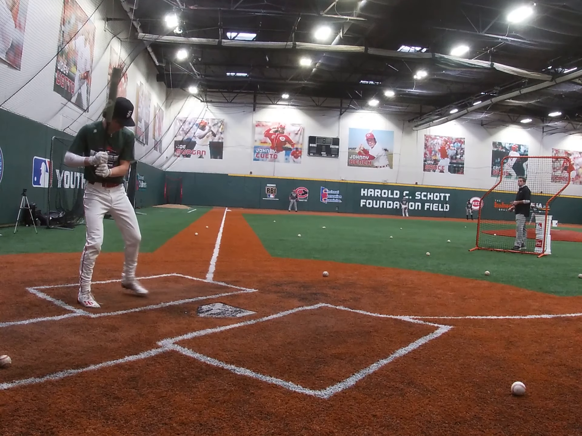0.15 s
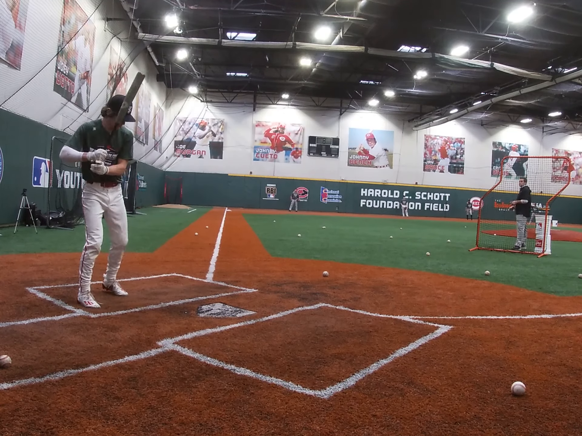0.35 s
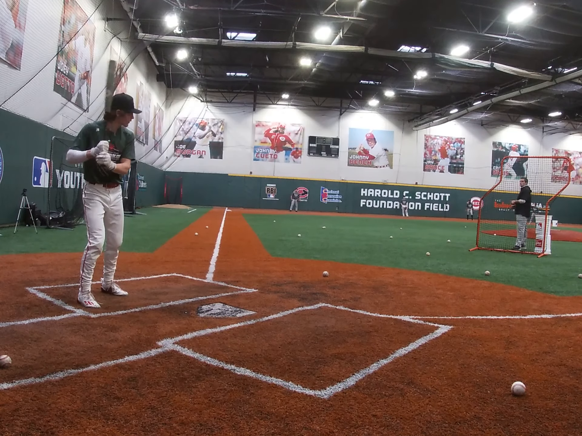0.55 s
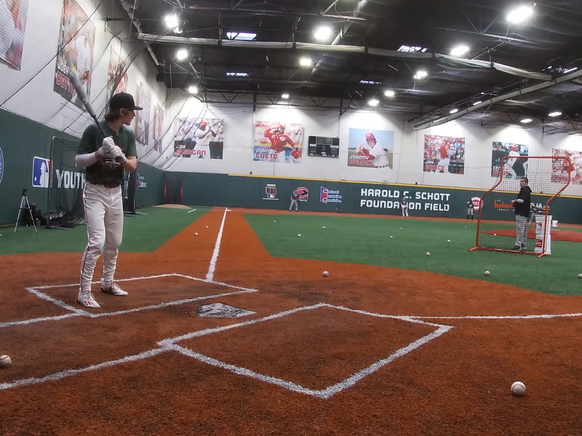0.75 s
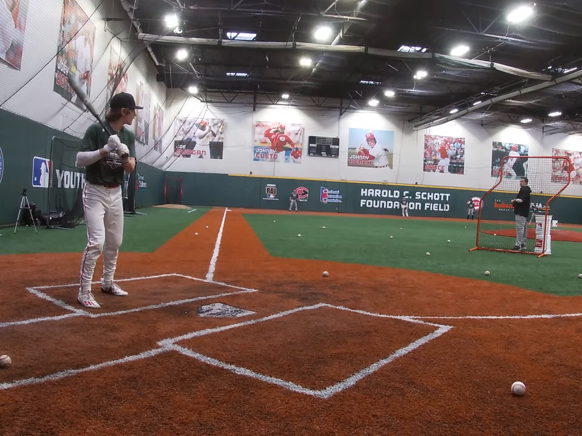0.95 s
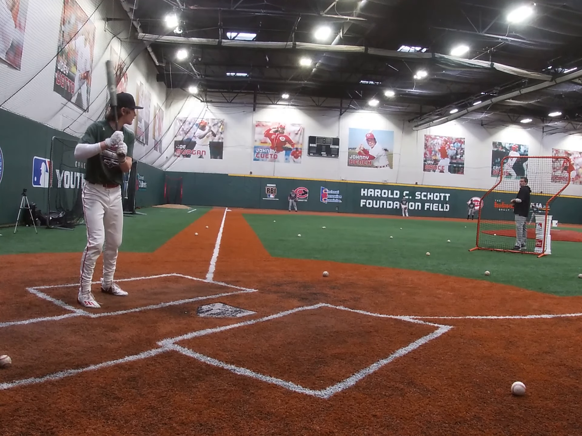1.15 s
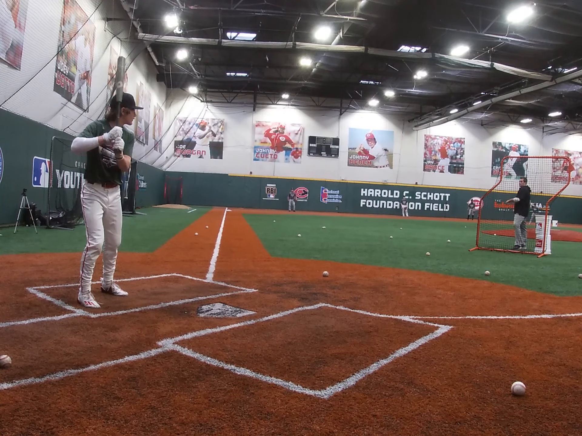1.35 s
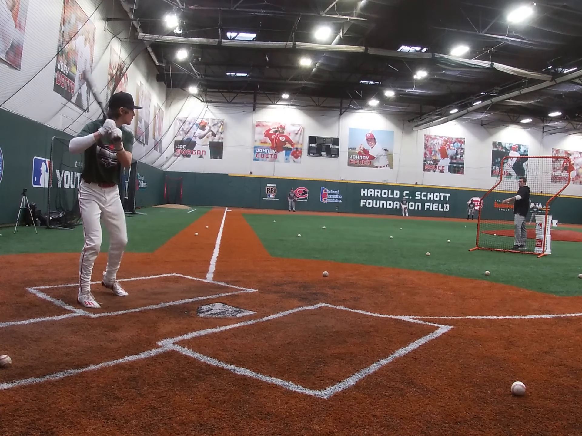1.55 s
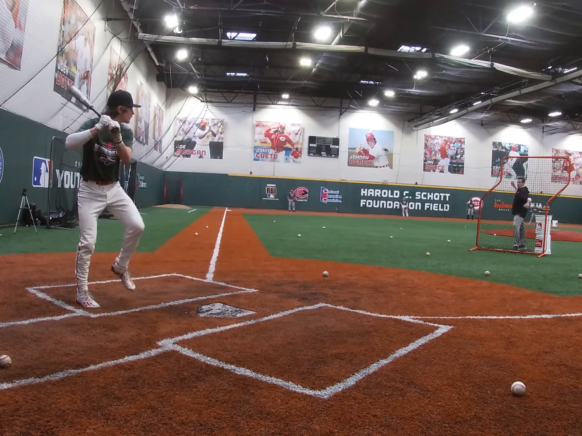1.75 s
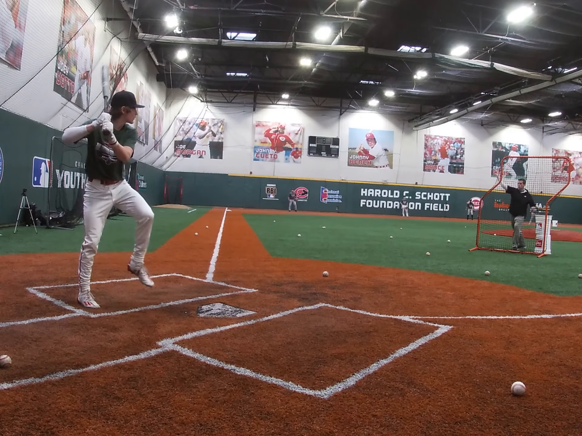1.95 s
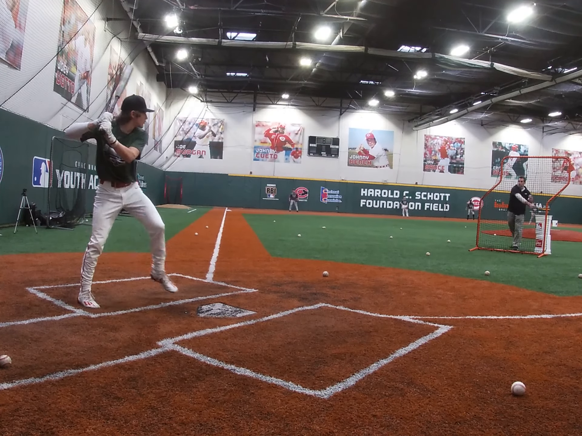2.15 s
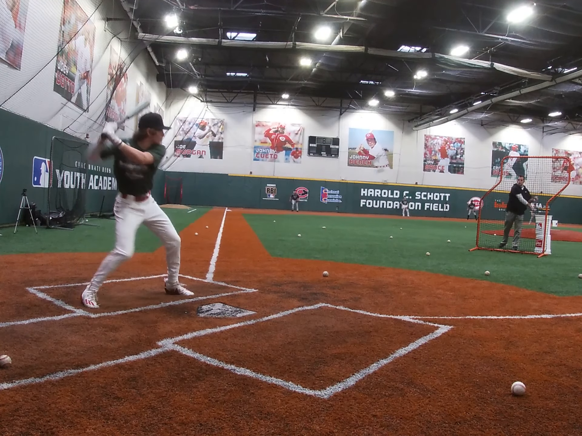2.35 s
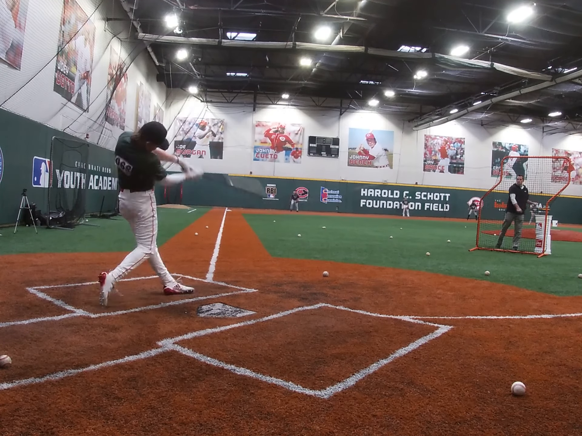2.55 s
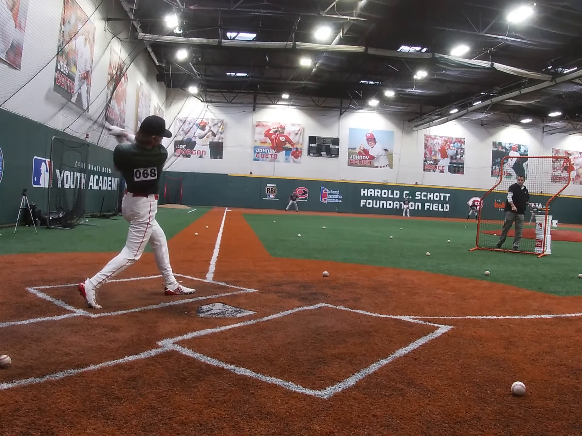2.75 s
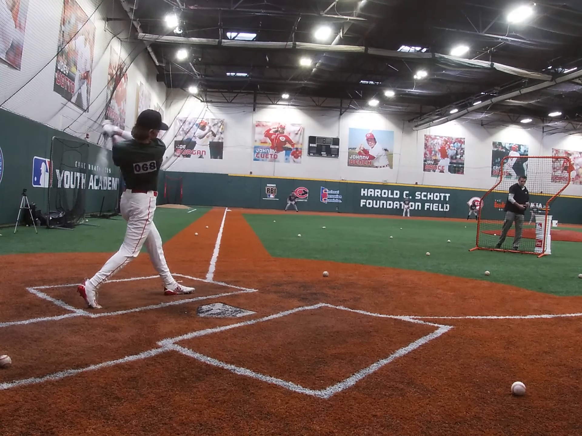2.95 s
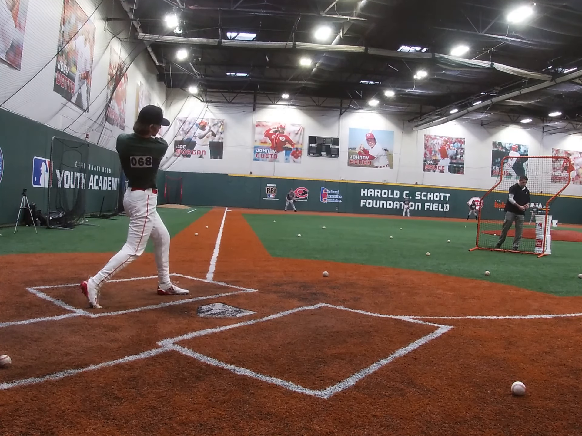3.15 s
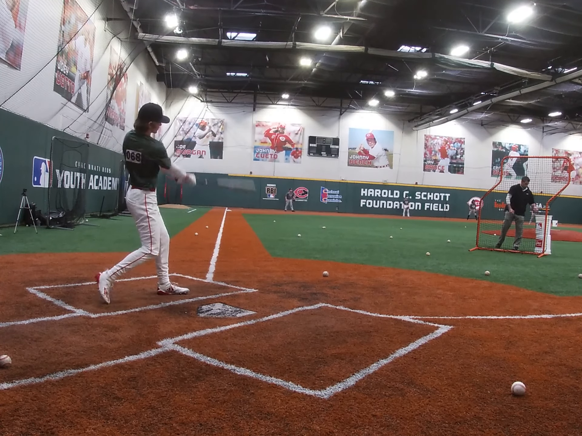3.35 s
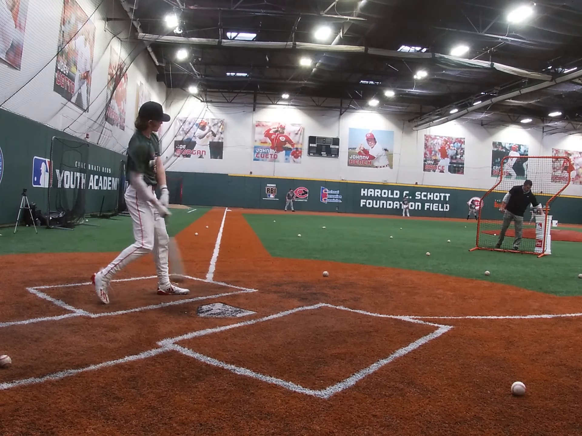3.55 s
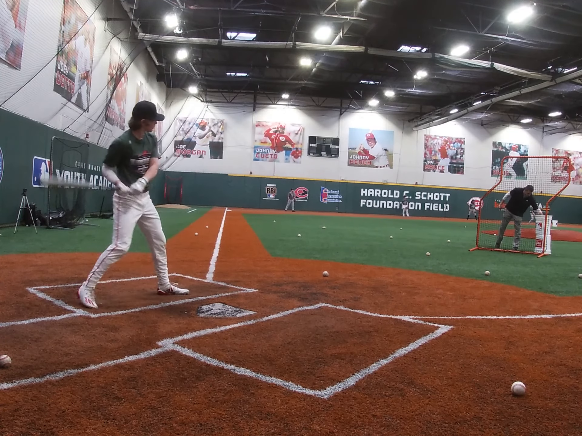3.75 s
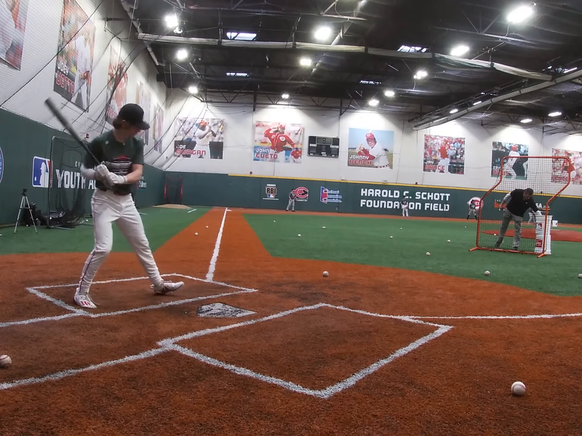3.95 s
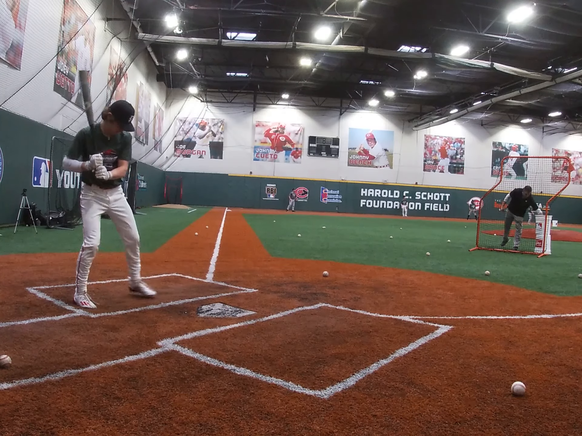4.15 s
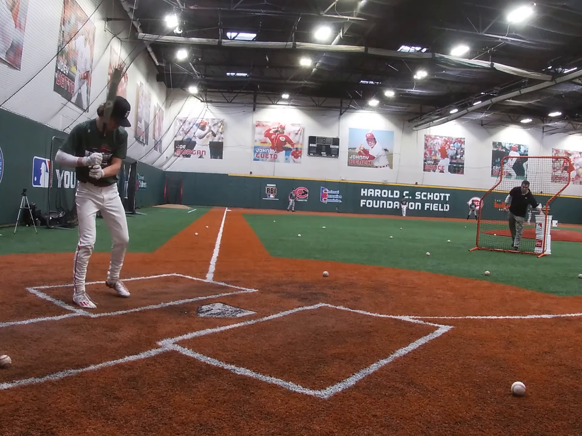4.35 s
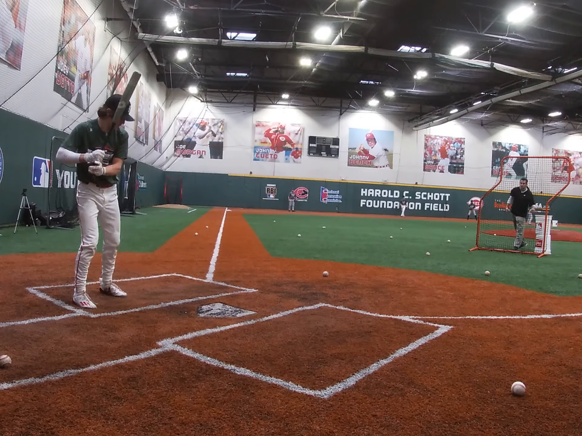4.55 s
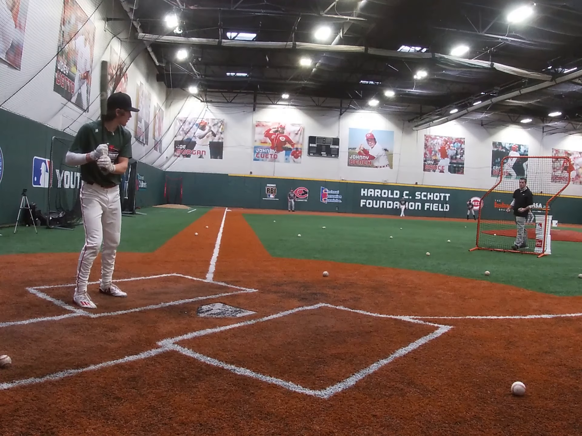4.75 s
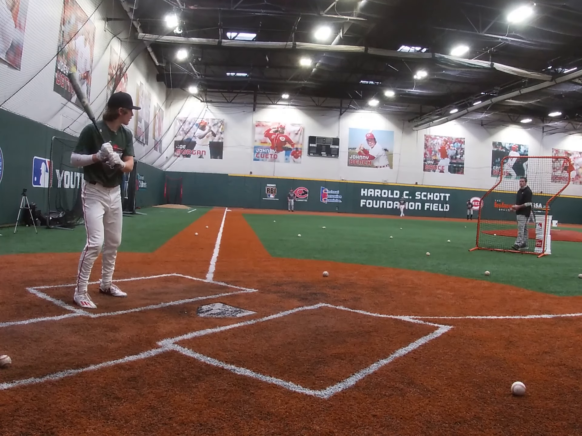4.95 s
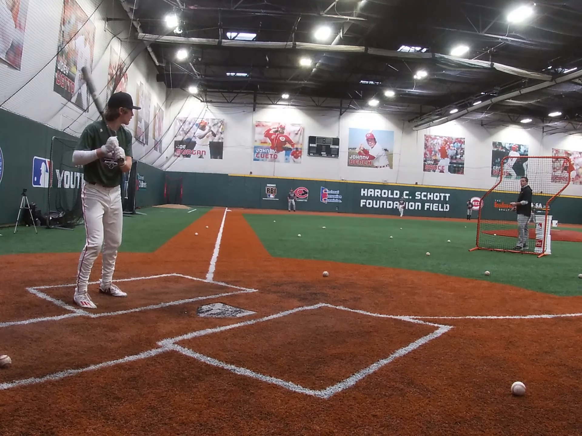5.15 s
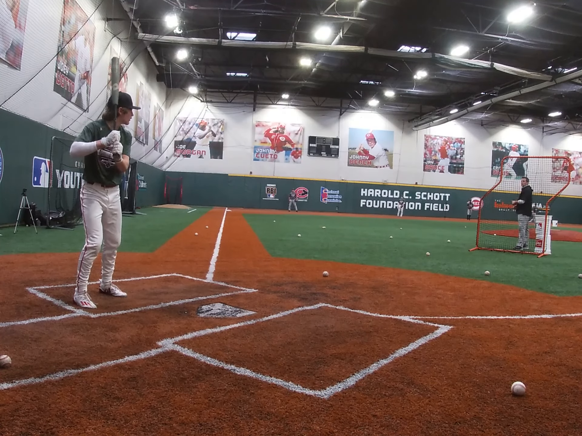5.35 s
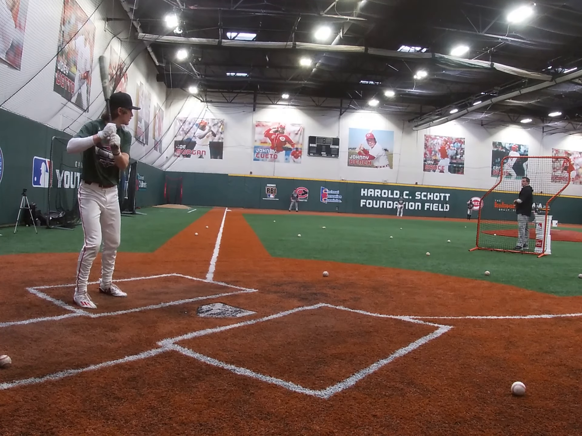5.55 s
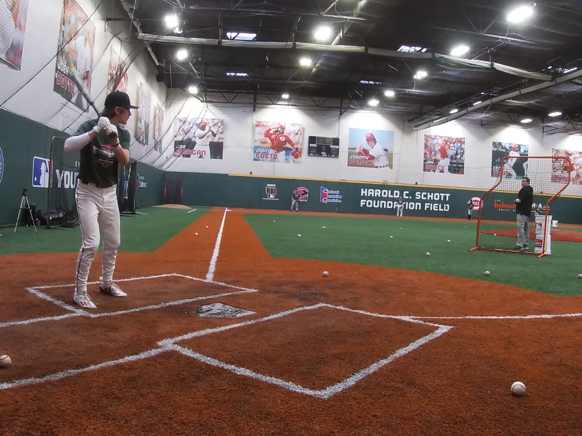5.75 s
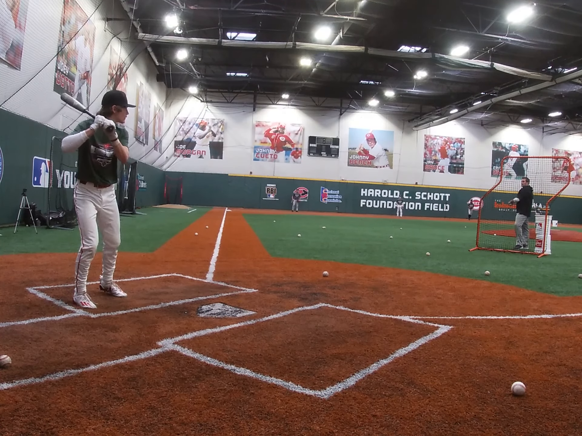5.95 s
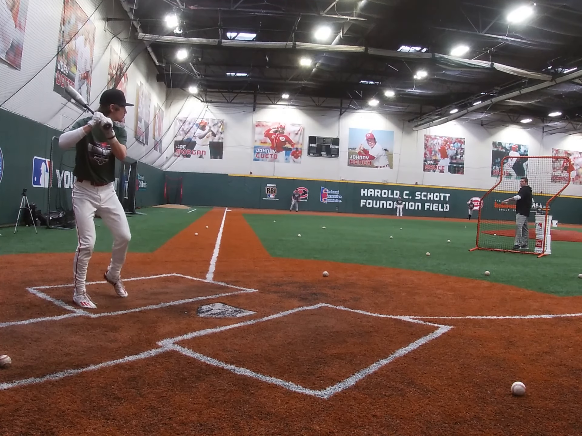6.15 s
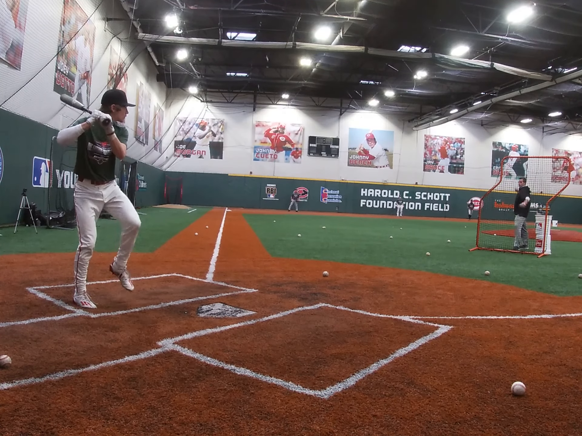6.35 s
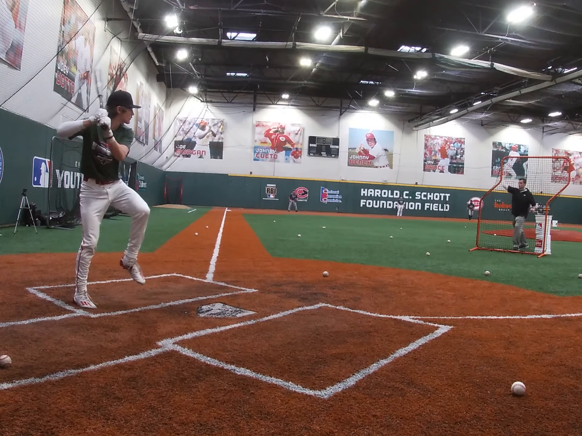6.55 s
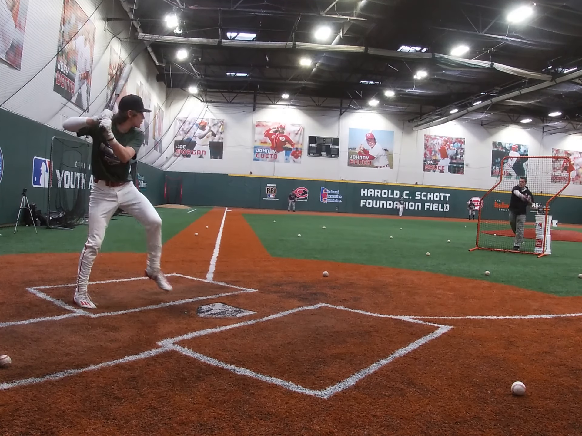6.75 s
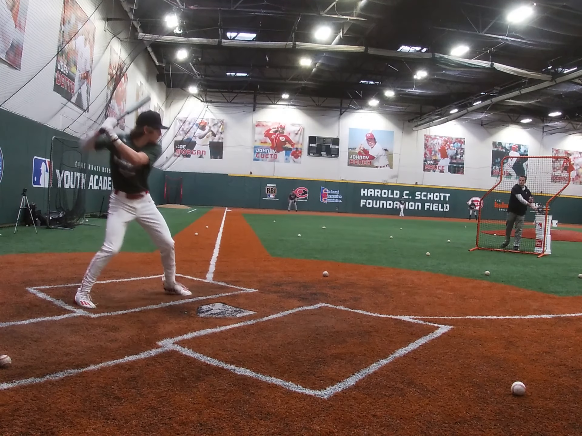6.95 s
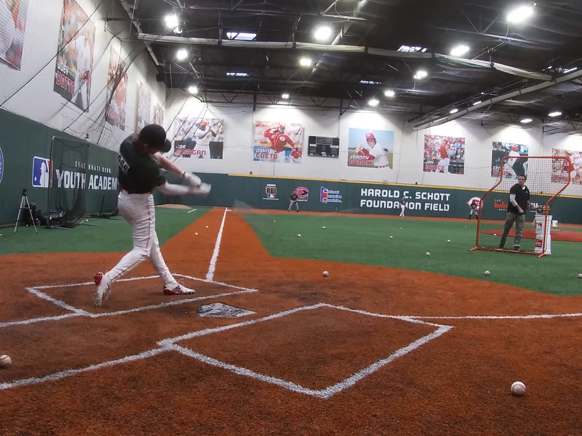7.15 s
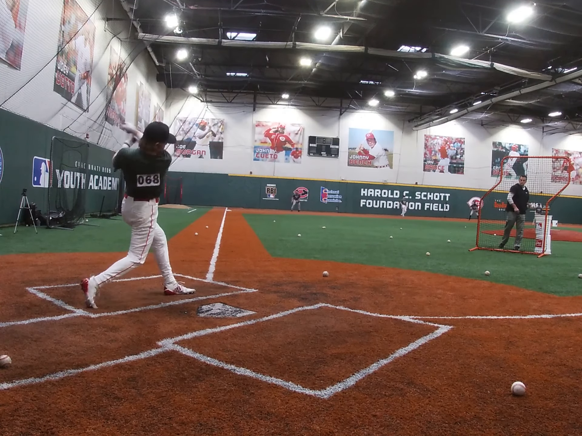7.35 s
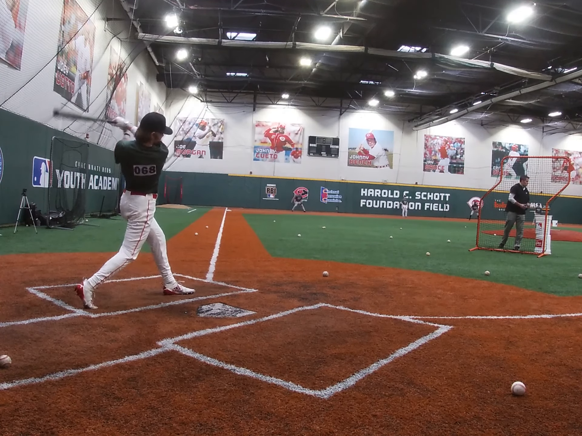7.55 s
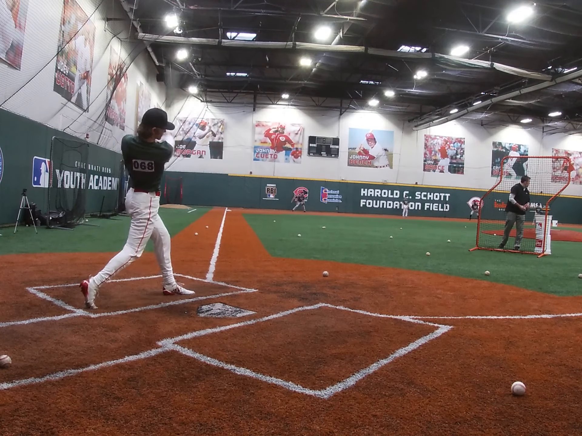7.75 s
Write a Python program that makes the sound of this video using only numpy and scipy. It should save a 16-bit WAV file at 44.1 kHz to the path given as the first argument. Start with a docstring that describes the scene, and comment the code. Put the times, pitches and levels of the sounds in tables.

```python
"""Ventilation rumbles through a large indoor hall, and a dull thud sounds further off, as batting practice begins.
Shoes scuff, then come two swings: each a swish of torn air, a hard crack of filtered impulse and a short modal ring.
The far wall and the roof throw the cracks back as slaps and pings over a diffuse tail; side netting adds a wash.
Between the swings balls scrape, jingle and clack in the thrower's wire basket: bursts of clicks ringing modes.
A limiter ducks everything after each crack and lets go slowly."""
import sys
import numpy as np
from scipy import signal
from scipy.fft import rfft, irfft
from scipy.io import wavfile
from scipy.ndimage import uniform_filter1d

SR = 44100
rng = np.random.default_rng(int(sys.argv[2]) if len(sys.argv) > 2 else 0)


def transcribe(signal):
    """Save signal, clipped to [-1, 1], as a 16-bit WAV file at the path in sys.argv[1]."""
    frames = np.atleast_2d(signal).T
    limited = np.clip(frames, -1, 1)
    pcm = np.round(limited * 32767).astype(np.int16)
    wavfile.write(sys.argv[1], SR, pcm)


N = 343980
T = np.arange(N) / SR
TAIL = T[:2 * SR]  # time axis of the reflections, in seconds


def undb(db):
    """Decibels to gain."""
    return 10 ** (np.asarray(db) / 20)


def unit(x):
    """Scale to rms 1."""
    return x / np.sqrt(np.mean(x ** 2))


def add(out, s, x):
    """Mix x into out from time s on."""
    i = int(s * SR)
    out[i:i + len(x)] += x[:len(out) - i]


def on_log(hz, points):
    """Read (Hz, value) points on a log-frequency axis."""
    f, value = np.transpose(points)
    return np.interp(np.log(hz + 1), np.log(f), value)


def colour(x, points):
    """Filter x by a (Hz, dB) curve."""
    hz = np.fft.rfftfreq(len(x), 1 / SR)
    return irfft(rfft(x) * undb(on_log(hz, points)), len(x))


def lowpass(x, hz, order=4):
    """Causal low-pass."""
    sos = signal.butter(order, min(hz, SR / 2 - 1000), fs=SR, output="sos")
    return signal.sosfilt(sos, x)


def walk(rate, size):
    """A random wander through `rate` new values a second, with a spread near 1."""
    return np.interp(T[:size] * rate, np.arange(1024), rng.standard_normal(1024))


def burst(length_s, grain_db=3, rise=0):
    """A dying cloud of uneven clicks, of unit energy; it swells over the share `rise` of its length."""
    t = T[:SR // 2]
    swell = np.minimum((t + 1 / SR) / (rise * length_s + 1 / SR), 1)
    unevenness = undb(grain_db * rng.standard_normal(len(t)))
    x = rng.standard_normal(len(t)) * unevenness * np.exp(-t / length_s) * swell
    return x / np.linalg.norm(x)


def rub(db, length_s, grain_db=3, rise=0):
    """A cloud of contact clicks whose strength is set by db, whatever its length."""
    return undb(db) * burst(length_s, grain_db, rise) * np.sqrt(length_s * SR / 2)


def ring(modes, pitch=1):
    """Damped sines from (Hz, t60 s, dB) rows: each mode of a struck body dies at its own rate."""
    t = T[:SR // 4]
    out = 0
    for hz, t60, db in modes:
        decay = np.exp(-np.log(1000) * t / t60)
        out = out + undb(db) * decay * np.sin(2 * np.pi * hz * pitch * t)
    return out


def resonate(clicks, modes, pitch=1):
    """A set of modes rings under a run of clicks."""
    body = ring(modes, pitch)
    return signal.fftconvolve(clicks, body / np.linalg.norm(body))


# Air noise from the ducts. Each row: frequency in Hz, spectral level in relative dB.
DUCT_AIR = [(12, -38), (20, -7.5), (42, 0.5), (63, 0), (108, -13), (175, -16.5), (205, -24), (268, -30.5),
            (360, -31), (390, -32.5), (538, -40), (2680, -51), (3320, -54), (7820, -68), (12000, -88.5),
            (15600, -119), (22000, -120)]
# Fan motor tones. Each row: frequency in Hz, rms level in dB.
FAN_HUM = [(120, -44.5), (179, -45.5), (360, -58)]


def ventilation(air_db=-25, flutter_db=0.5, waver_rad=0.49, hiss_db=-63):
    """Duct rumble that flutters, a steady hiss from the outlets, and motor hum of wavering phase."""
    air = undb(air_db) * unit(colour(rng.standard_normal(N), DUCT_AIR))
    rumble = colour(air, [(150, -2.5), (400, -45.5)])
    flutter = rumble * (undb(flutter_db * walk(8.6, N)) - 1)
    hiss = colour(rng.standard_normal(N), [(1000, -16.0), (2500, -10.5), (3400, 0.5), (4500, -11.5),
                                           (8400, -13.5), (9500, -37.0), (13000, -59.5)])
    hum = 0
    for hz, db in FAN_HUM:
        phase = 2 * np.pi * hz * T + waver_rad * walk(9.7, N)
        hum = hum + undb(db) * np.sqrt(2) * np.sin(phase)
    return air + flutter + undb(hiss_db) * unit(hiss) + hum


# Tone of the wash round a dull thud further off. Each row: frequency in Hz, gain in dB.
THUD_WASH = [(100, -13), (250, -1), (550, -7.5), (850, -22.5), (2000, -27), (8000, -59)]


def distant_thud(start_s=.0975, mode_db=-23, mode_hz=560, mode_t60_s=0.013, wash_db=16):
    """One short, dulled mode for the blow, and a noise burst for its wash of reflections."""
    thud, wash = np.zeros((2, N))
    add(thud, start_s, lowpass(ring([(mode_hz, mode_t60_s, mode_db)]), 620))
    add(wash, start_s, undb(wash_db) * lowpass(burst(0.12, rise=0.15), 7000))
    return thud + colour(wash, THUD_WASH)


# Shoes scuffing the turf. Each row: start in seconds, level in dB before the tone curve.
SHOE_SCUFFS = [(2.43, -56), (2.592, -46), (6.1, -56), (6.294, -54)]
# Low thumps as the batter steps back. Each row: start in seconds, level in dB before the low-pass.
BACK_STEPS = [(4.035, -6.5), (4.239, -15)]


def shoes(scuff_s=0.0082, step_hz=52, step_t60_s=0.045):
    """Scuffs are short clouds of friction clicks; steps are single damped low modes."""
    scuffs, steps = np.zeros((2, N))
    for s, db in SHOE_SCUFFS:
        add(scuffs, s, rub(db, scuff_s))
    for s, db in BACK_STEPS:
        add(steps, s, lowpass(ring([(step_hz, step_t60_s, db)]), 180))
    return steps + colour(scuffs, [(1000, -21.0), (4000, 7.5), (8500, 0.0), (12000, -32.0)])


# The swings, shared by swish and batting. Each row: moment of the crack in seconds, gain of the blow in dB,
# hall send in dB, ring sent into the hall in dB, Doppler rise of the ring towards the far wall as a share
# of its pitch, side netting send in dB, ring sent into the netting in dB.
BAT_SWINGS = [(2.6471, 5.5, -2.5, -.5, .103, -12, 3), (7.2654, 2, -3.5, -8, .085, -19, -2.5)]


def swish(db=-33, rise_s=0.015, fall_s=0.016):
    """Air torn by the barrel: coloured noise, loudest where the bat is fastest."""
    speed = 0
    for s, *_ in BAT_SWINGS:
        speed = speed + np.exp(-np.maximum((s - T) / rise_s, (T - s) / fall_s))
    air = colour(rng.standard_normal(N), [(60, -32.5), (220, 3.0), (600, -7.5), (3000, -18.0),
                                          (8000, -28.0), (12000, -47.5)])
    return undb(db) * speed * unit(air)


def crack(spectrum, dispersion=0.855):
    """The blow itself: bending waves carry the treble out first and the bass a millisecond or two later."""
    hz = np.fft.rfftfreq(SR // 4, 1 / SR)
    delay = np.exp(-1j * dispersion * np.sqrt(hz))  # phase in radians grows with the root of frequency
    blow = irfft(undb(on_log(hz, spectrum)) * delay, SR // 4)
    return blow * np.exp(-(T[:SR // 4] / .05) ** 2)


# A surface that scatters for this long returns half its energy as a clean slap.
MIRROR_S = .002


def echoes(table, low_hz=500, air_db_per_s=18, grain_db=9):
    """Each surface returns a mirror-like slap and scattered ones; the long way through the air dulls them."""
    out, hz = np.zeros(len(TAIL)), np.fft.rfftfreq(SR // 2, 1 / SR)
    for lag, db, scatter_s, edge_hz in table:
        mirror = MIRROR_S / (MIRROR_S + scatter_s)  # share of energy in the clean slap
        scattered = np.sqrt(1 - mirror) * burst(scatter_s, grain_db)
        slap = lowpass(np.r_[np.sqrt(mirror), scattered], edge_hz)
        air_loss_db = air_db_per_s * lag * (hz / 7000) ** 2  # the rate holds at 7 kHz
        slap = irfft(rfft(slap, SR // 2) * undb(-air_loss_db))[:SR // 4]
        add(out, lag, undb(db) * slap)
    sos = signal.butter(2, low_hz, "high", fs=SR, output="sos")
    return signal.sosfilt(sos, out + 1e-18)


FAR_DB, FAR_LOSS_DB_PER_S = -3, 33.5  # base gain, and loss with lag: a longer path returns less
PING_EDGE_SHARE = 0.77  # the ring comes back duller than the crack
# Every wall echo comes again by way of the roof: further lag, gain, scatter, share of the treble edge.
ROOF_LAG_S, ROOF_DB, ROOF_SCATTER_S, ROOF_EDGE_SHARE = .022, -6.5, .035, .85


def far_wall(blow, bat_ring, lag, scatter_s, low_hz, edge_hz, ring_db, strength_db):
    """A wall returns the crack as a slap and the ring as a clean ping, weaker with lag; a roof wash follows."""
    db = FAR_DB + strength_db - FAR_LOSS_DB_PER_S * lag
    straight = (lag, db, scatter_s, edge_hz)
    by_roof = (lag + ROOF_LAG_S, db + ROOF_DB, ROOF_SCATTER_S, edge_hz * ROOF_EDGE_SHARE)
    out = signal.fftconvolve(blow, echoes([straight, by_roof], low_hz, grain_db=4.5))
    add(out, lag, undb(db + ring_db) * lowpass(bat_ring, edge_hz * PING_EDGE_SHARE))
    return out


# The hall's diffuse tail. Each row: band centre in Hz, level in relative dB, t60 in seconds.
HALL_BANDS = [(100, -58, .6), (230, -36, 0.36), (439, -41, 1.9), (1030, -40, 2.75), (2520, -36, 2.66),
              (3950, -39.5, 1.75), (5000, -43.5, 1.6), (7800, -34, 0.73), (10130, -48.5, 0.61),
              (15100, -49.5, .3)]


def hall(build_s=0.0078):
    """Diffuse tail: noise builds up quickly and each band decays at its own rate."""
    noise = rfft(rng.standard_normal(len(TAIL)))
    hz, rows = np.fft.rfftfreq(len(TAIL), 1 / SR), np.array(HALL_BANDS)
    out = 0
    for share, (_, db, t60) in zip(np.eye(len(rows)), rows):
        band = irfft(noise * on_log(hz, np.c_[rows[:, 0], share]))  # bands crossfade into each other
        out = out + band * undb(db) * np.exp(-np.log(1000) * TAIL / t60)
    return out * (1 - np.exp(-(TAIL / build_s) ** 2))


def clumped(tail):
    """The roof trusses return the tail as clumps of separate reflections."""
    clumps_db = 3 * walk(700, len(tail)) + 1.2 * walk(60, len(tail))
    return tail * unit(undb(clumps_db))


# Bat modes. Each row: frequency in Hz, t60 in seconds, relative dB in the first swing, in the second.
BAT_MODES = [(1030, .012, -25, -56), (1460, .1, -47, -33), (2385, .12, -18.5, -50), (2800, .12, -26, -16),
             (3760, .014, -12, -22), (5930, .04, -34, -46), (6730, .09, -45, -34), (7740, .03, -27, -40)]
# Crack of ball on barrel. Each row: frequency in Hz, relative dB in the first swing, in the second.
CRACK_SPECTRA = [(59.7, 27, 19), (281, 21.5, 26.5), (463, 8.5, 15), (625, 18, 18.5), (980, 21.5, 24),
                 (1290, 20.5, 27.5), (1720, 22, 25), (2180, 23.5, 21), (3210, 21.5, 27.5), (4000, 19, 22),
                 (4530, 15, 21), (5800, 12.5, 15.5), (8260, 6.5, 11), (12150, -6.5, -1.5),
                 (15000, -30, -33.5)]
# Ground and surfaces round the plate. Each row: lag in seconds, scatter in seconds, treble edge in Hz,
# gain in dB in the first swing, in the second.
PLATE_ECHOES = [(.0012, 0.0028, 7070, -5, -7), (.0033, .0008, 8100, -5.5, -8.5),
                (.0058, 0.0026, 9500, -7, -17), (.0196, .0004, 4200, -9.5, -14),
                (.037, .009, 9000, -8.5, -17)]
# Far walls. Each row: lag in seconds, scatter in seconds, bass edge in Hz, treble edge in Hz,
# share of the bat's ring in dB, relative strength in dB in the first swing, in the second.
WALLS = [(.104, 0.0057, 900, 4500, 11.5, -10, -28), (.1783, 0.0084, 696, 5000, -6, -2.5, -5),
         (.189, 0.02, 510, 5500, 7, 1, 2.5), (.216, 0.012, 700, 5450, -5, -1.5, -1.5),
         (.2645, 0.0068, 1100, 7300, 8.5, -1, 0.5), (.286, 0.013, 610, 3630, -5, 3.5, -1),
         (.305, 0.0089, 685, 3800, 2, -3.5, -4.5), (.403, 0.03, 700, 3550, -3, 0.5, 3),
         (.4425, 0.011, 1490, 4700, 7, 3.5, 3), (.476, 0.022, 600, 4320, -13, 3.5, 3),
         (.572, 0.0019, 1000, 3360, 3, 7.5, 0), (.645, 0.0076, 1600, 4830, -1, 4, 0),
         (.679, .005, 1100, 3300, 2, 4.5, 0), (.74, .012, 900, 3500, 2, -1, 0),
         (.838, 0.0068, 1000, 3300, -1, 2, 0), (.853, 0.0068, 1500, 5000, -4, 1, 0),
         (.88, .015, 900, 3170, -4, 8, 0), (.928, 0.0046, 2500, 4600, 0, 5, 0),
         (1.04, 0.038, 900, 3300, -8, 3, 0)]
# Paths into the hall. Each row: share of the Doppler rise, hall gain in dB, extra ring in the hall in dB,
# extra ring in the netting in dB.
HALL_PATHS = [(0, -6.5, 1, 0), (.47, -4.5, -1, -6), (1, -5, 1, -8)]
# The direct ring swells as the bat turns broadside to the listener.
NEAR_RING_DB, NEAR_RING_SWELL_S = 8.5, .014


def batting(netting_lag_s=.03, netting_scatter_s=0.088, netting_edge_hz=8500):
    """The moving bat rings at its own pitch towards the listener behind it, higher towards the far wall."""
    out = np.zeros(N)
    netting_row = (netting_lag_s, 0, netting_scatter_s, netting_edge_hz)
    nettings = [echoes([netting_row], low_hz=800, grain_db=3.5) for _ in HALL_PATHS]
    tails = [clumped(hall()) for _ in HALL_PATHS]
    for k, swing in enumerate(BAT_SWINGS):
        s, db, hall_db, ring_db, doppler, netting_db, netting_ring_db = swing
        modes = [(hz, t60, dbs[k]) for hz, t60, *dbs in BAT_MODES]
        blow = crack([(hz, dbs[k]) for hz, *dbs in CRACK_SPECTRA])
        backward, forward = ring(modes), ring(modes, 1 + doppler)

        near_rows = [(lag, dbs[k], scatter_s, edge_hz) for lag, scatter_s, edge_hz, *dbs in PLATE_ECHOES]
        near = echoes(near_rows, low_hz=217)
        near[0] += 1  # the direct path
        sound = signal.fftconvolve(blow, near + undb(netting_db) * nettings[0])
        swell = 1 - np.exp(-T[:len(backward)] / NEAR_RING_SWELL_S)
        add(sound, 0, undb(NEAR_RING_DB) * backward * swell)

        for *wall, first_db, second_db in WALLS:
            sound += far_wall(blow, forward, *wall, strength_db=(first_db, second_db)[k])

        for (share, share_db, extra_db, side_db), tail, netting in zip(HALL_PATHS, tails, nettings):
            shifted = ring(modes, 1 + share * doppler)
            sound += undb(netting_ring_db + side_db) * signal.fftconvolve(shifted, netting)
            into_hall = blow + undb(ring_db + extra_db) * shifted
            sound += undb(hall_db + share_db) * signal.fftconvolve(into_hall, tail)
        add(out, s, undb(db) * sound)
    return out


# Balls scraping along the basket. Each row: start in seconds, level in dB before colouring,
# decay length in seconds.
BALL_SCRAPES = [(3.882, -46, 0.018), (3.914, -36, 0.074), (4.016, -36.5, 0.079), (4.293, -48, .032),
                (4.755, -57, .04)]
# Balls striking the wires. Each row: start in seconds, level in dB before the wires ring, wire pitch in Hz,
# decay length of the contact in seconds.
WIRE_JINGLES = [(4.049, -34.5, 6190, .043), (4.228, -43, 6390, .041), (4.756, -66, 5880, .05),
                (4.89, -67, 5750, .06)]
# Balls clacking together. Each row: start in seconds, level in dB before colouring, decay length in seconds.
BALL_CLACKS = [(3.935, -37.5, .018), (4.039, -31.5, .009), (4.141, -33, .024), (4.2455, -30, .011)]
# Tone of a scrape. Each row: frequency in Hz, gain in dB.
SCRAPE_TONE = [(700, -26), (1200, -16), (1700, 9), (2800, 0.5), (3800, 10.5), (5000, -0.5), (8000, -0.5),
               (9500, -15), (11000, -44), (14000, -40)]
# Tone of a clack. Each row: frequency in Hz, gain in dB.
CLACK_TONE = [(1000, -27.5), (2500, -8), (3900, 8.5), (5500, -7.5), (9000, -33), (14000, -57)]
# Modes of the basket's wires. Each row: pitch ratio, t60 in seconds, relative level in dB.
WIRE_MODES = [(1, .05, 0), (1.034, .03, -3), (1.245, .02, -9)]
# Modes of the basket's rim, which rings under a scrape. Each row: frequency in Hz, t60 in seconds,
# relative level in dB.
RIM_MODES = [(1530, .035, -3), (1730, .035, 0), (2350, .01, 2), (3620, .04, 0), (4230, .025, -4)]
WIRE_HZ, SCRAPE_WIRE_DB, RIM_DB = 6190, -10.5, -6.5  # wire pitch, wire and rim gains under a scrape


def basket(wet_db=-9, wet_edge_hz=6000, grain_db=6, rise=0.28):
    """Balls scrape along the basket, set its wires and rim ringing and clack together; the hall answers."""
    scrapes, jingle, clacks = np.zeros((3, N))
    for s, db, length_s in BALL_SCRAPES:
        clicks = rub(db, length_s, grain_db, rise)
        add(scrapes, s, clicks)
        add(jingle, s, undb(SCRAPE_WIRE_DB) * resonate(clicks, WIRE_MODES, WIRE_HZ))
        add(jingle, s, undb(RIM_DB) * resonate(clicks, RIM_MODES))
    for s, db, hz, length_s in WIRE_JINGLES:
        add(jingle, s, resonate(rub(db, length_s, grain_db, rise), WIRE_MODES, hz))
    for s, db, length_s in BALL_CLACKS:
        add(clacks, s, rub(db, length_s))
    direct = colour(scrapes, SCRAPE_TONE) + colour(clacks, CLACK_TONE) + lowpass(jingle, 8900)
    reverb = signal.fftconvolve(lowpass(direct, wet_edge_hz, order=2), hall())[:N]
    return direct + undb(wet_db) * reverb


# Modes of the basket's frame. Each row: frequency in Hz, t60 in seconds, relative level in dB.
FRAME_MODES = [(1160, 0.022, -3), (1635, 0.014, 1), (2460, 0.011, -3.5), (3000, .012, -5)]


def rolling(peak_s=4.94, rise_s=.36, fall_s=0.36, db=-53.5, grain_db=6, edge_hz=3800):
    """The disturbed balls roll and settle; their tiny contacts sound the basket's frame."""
    motion = np.exp(-np.maximum((peak_s - T) / rise_s, (T - peak_s) / fall_s) ** 2)
    unevenness = undb(grain_db * rng.standard_normal(N))
    contacts = lowpass(rng.standard_normal(N) * unevenness, edge_hz)
    return undb(db) * motion * unit(resonate(contacts, FRAME_MODES)[:N])


def scene():
    """Everything as it reaches one microphone behind the plate."""
    before_contact = ventilation() + distant_thud() + shoes() + swish()
    return (before_contact + batting() + basket() + rolling())[None]


def record(dry, threshold_db=-6, release_db_per_s=5, top_hz=16000):
    """A limiter grabs each crack and lets go slowly; what overshoots is clipped, and the top is cut."""
    power = np.abs(uniform_filter1d(dry[0] ** 2, size=64))
    over_db = 10 * np.log10(power + 1e-12) - threshold_db
    release_db = release_db_per_s * T
    held_db = np.maximum.accumulate(over_db + release_db) - release_db  # peak hold that falls steadily
    limited = np.clip(dry * undb(-np.maximum(held_db, 0)), -.93, .93)
    return signal.sosfilt(signal.ellip(8, .2, 70, top_hz, fs=SR, output="sos"), limited)


dry = scene()
out = record(dry)
transcribe(out)
```